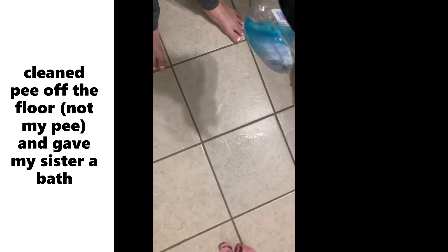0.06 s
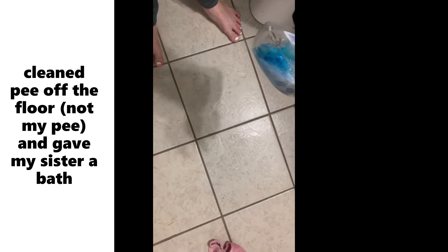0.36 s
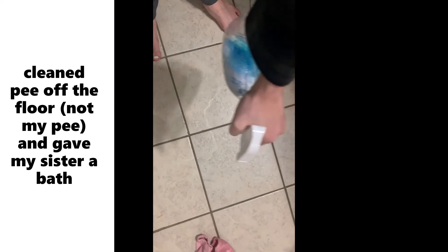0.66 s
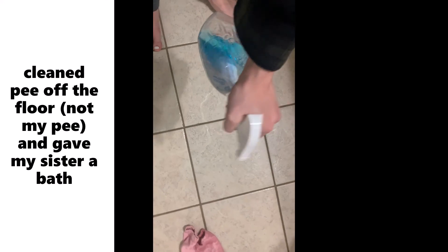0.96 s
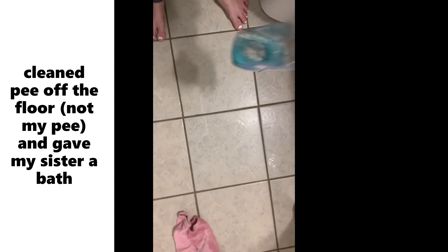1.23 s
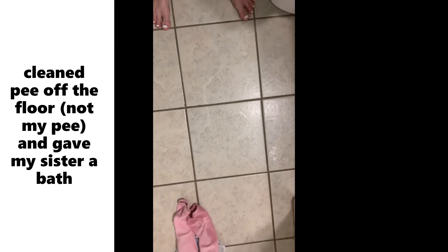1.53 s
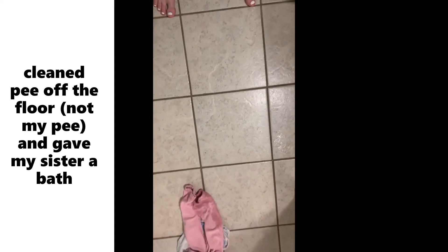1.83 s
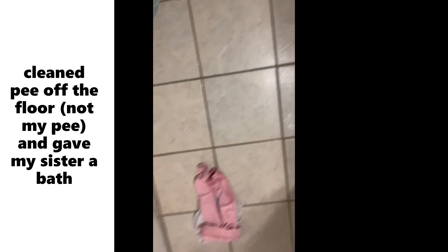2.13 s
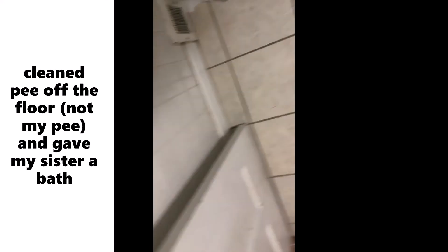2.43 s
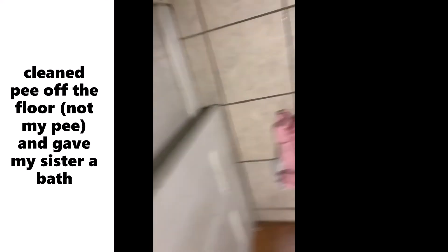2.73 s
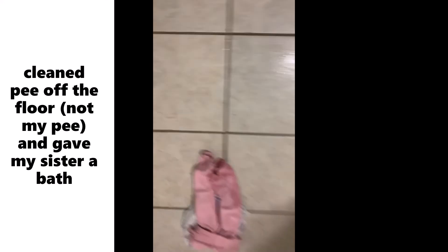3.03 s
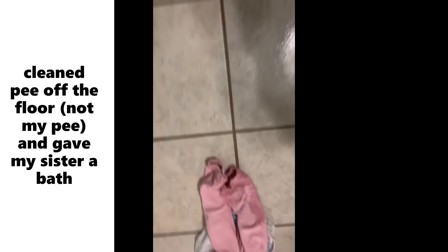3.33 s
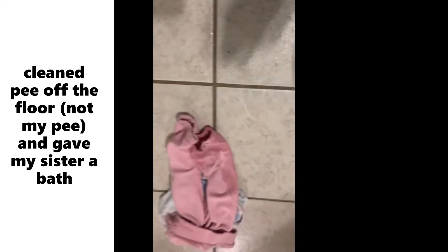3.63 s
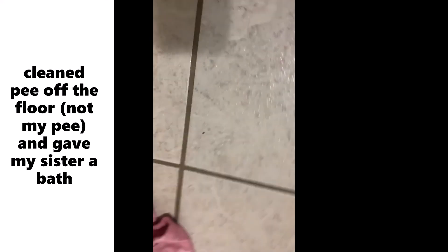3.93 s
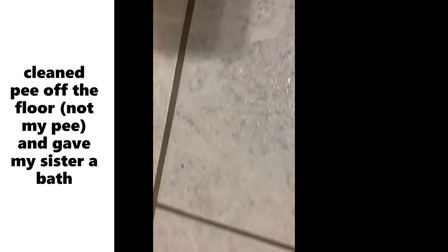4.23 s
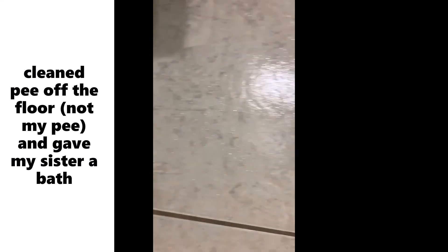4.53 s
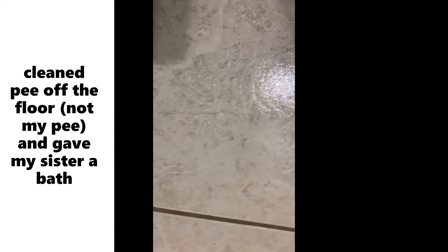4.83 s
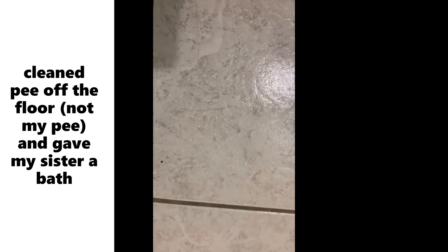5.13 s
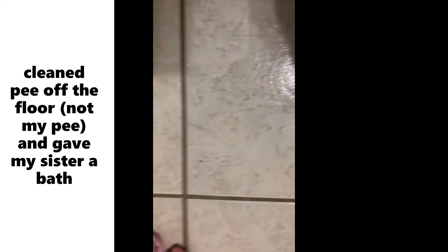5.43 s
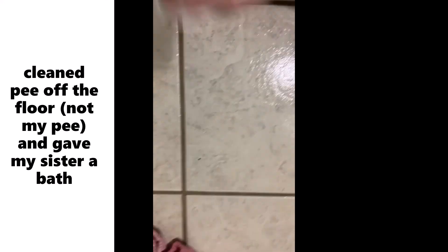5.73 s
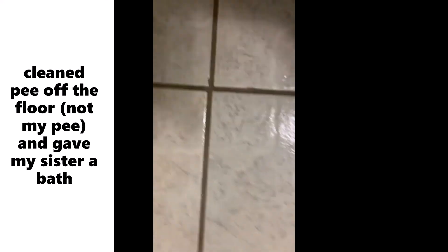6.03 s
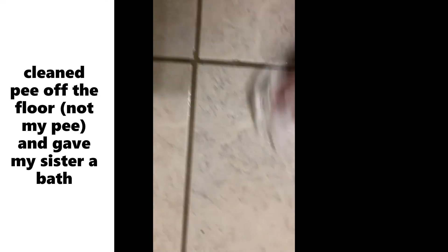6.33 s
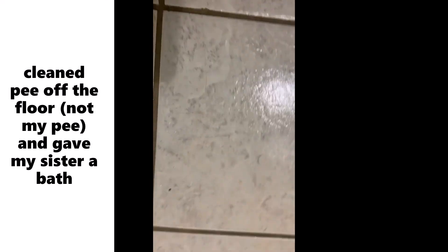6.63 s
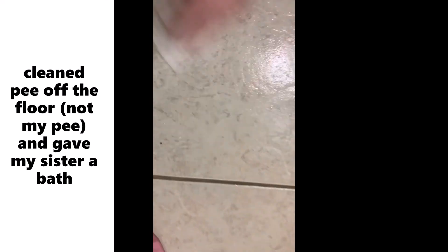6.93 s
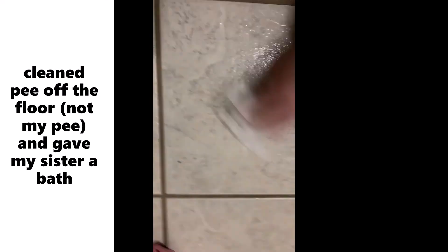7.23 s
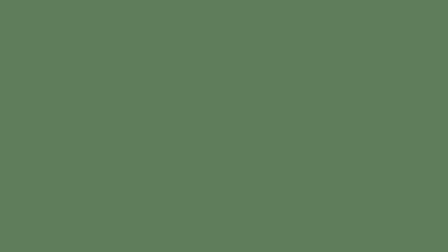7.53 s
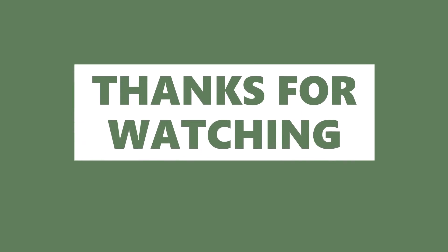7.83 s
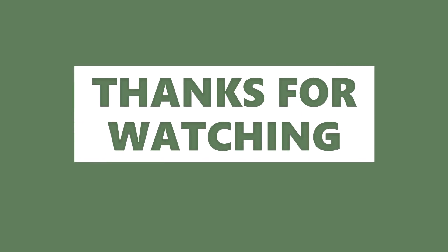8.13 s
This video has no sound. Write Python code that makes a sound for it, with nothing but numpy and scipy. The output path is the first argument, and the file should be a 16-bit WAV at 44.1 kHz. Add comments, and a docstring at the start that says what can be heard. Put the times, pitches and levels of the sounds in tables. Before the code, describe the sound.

A bath tap runs steadily into a tub, splashing and gurgling over a faint pipe hum, with one close double knock.

```python
"""Bath tap filling a tub

In a small tiled room the jet sprays, spits, churns up bubbles and rumbles in the tub.
The flow keeps the pipe singing on two notes; levels drift as the listener moves about.
Soft low thumps come and go, one double knock sounds close by, and all stops abruptly near the end."""
import sys
import numpy as np
from scipy import signal
from scipy.fft import rfft, irfft, next_fast_len
from scipy.io import wavfile
from scipy.ndimage import uniform_filter1d

SR = 44100
rng = np.random.default_rng(int(sys.argv[2]) if len(sys.argv) > 2 else 0)


def wrap_up_sound(samples):
    """Save the sound to the file named by the first command line argument, as 16-bit audio."""
    columns = np.atleast_2d(samples).T
    # keep every value between -1 and 1, then stretch to whole-number steps
    tamed = np.clip(columns, -1, 1)
    steps = np.round(tamed * 32767).astype(np.int16)
    wavfile.write(sys.argv[1], SR, steps)


N = 369116
TIME_S = np.arange(N) / SR

# Spectra of spray, splash, rumble and tub hollow. Each row: frequency in Hz, relative level in dB.
SPRAY_SPECTRUM = [(900, -32), (2000, -6.5), (3300, 2.5), (7000, -1), (12600, -5), (13600, -13.5),
                  (15700, -12.5)]
SPLASH_SPECTRUM = [(150, -13), (320, -2), (370, 9.5), (460, 8.5), (560, 0), (650, 1.5), (900, -1),
                   (1450, 0), (2200, -2.5), (3300, -7.5), (6000, -12.5)]
RUMBLE_SPECTRUM = [(20, -24), (45, -10.5), (60, -2), (75, 3), (92, -5), (112, -2.5), (131, 4), (152, -6),
                   (172, -1.5), (195, -4), (300, -32)]
HOLLOW_SPECTRUM = [(100, -33.5), (145, -14.5), (165, -1.5), (180, -9.5), (204, 5.5), (226, -5), (246, 1.5),
                   (264, -9), (290, -4), (325, -14.5), (362, -4.5), (385, -5.5), (405, -15), (600, -44)]
# Left-right likeness. Each row: frequency in Hz, shared fraction of the power.
LIKENESS = [(25, .82), (60, .9), (200, .94), (440, .87), (600, .52), (1000, .46), (2600, .42), (3400, .68),
            (8000, .67), (12000, .62), (15000, .56)]
# Centres of treble bands where left and right are nearly alike.
ALIKE_HZ = [4960, 7050, 9000, 10950, 12880, 14850]
# Each row: frequency in Hz, lead of left over right in radians.
LEFT_LEAD = [(0, 0), (650, .4), (1200, -.2), (2000, -1.8), (2450, -1.7), (2900, -.8), (3600, -.9),
             (4500, -2.35), (16000, -20.7)]
# Tub and room resonances. Each row: centre in Hz, width in Hz, lift in dB.
TUB_MODES = [(460, 38, 0), (558, 16, 7), (637, 22, 4.5), (1103, 24, 1.5), (1415, 60, 1), (1810, 26, 2),
             (2450, 50, 2), (3300, 160, 1), (6910, 140, 3)]
# Drift as the listener moves. Each row: time in seconds, spray gain in dB, splash gain in dB.
JET_LEVELS = [(0.0, -36, -34.5), (0.15, -35.5, -35), (0.32, -39.5, -36), (0.7, -38, -37.5),
              (1.3, -37.5, -35), (1.7, -36.5, -39.5), (2.15, -33.5, -36.5), (2.5, -35, -39.5),
              (3.0, -37.5, -37.0), (3.3, -36, -37), (4.15, -36.5, -35.5), (4.95, -37.5, -35.5),
              (5.55, -39.0, -37), (6.1, -37.5, -35), (6.6, -34.5, -35.3), (6.85, -36.5, -34.5),
              (7.25, -35.5, -35), (7.5, -38.5, -39.5)]
# Heavy slugs of water. Each row: start in seconds, spray lift in dB, splash lift in dB.
SLUGS = [(.085, 1.5, -1.5), (.22, -2, 1.5), (0.368, 3, 2.5), (0.529, -1, 2.5), (.6, -2, -2),
         (0.713, 5, 3.5), (.775, -1, 1), (.84, 1, 4.5), (0.903, 2, 3.5), (.995, 1, -1.5), (1.09, 1.5, 1),
         (1.343, 2, 3), (1.523, 2.5, 3.5), (1.803, -3, 4.5), (2.128, 1, 2.5), (2.205, -1, 4), (3.035, 0, 0),
         (3.125, 0, 2.5), (3.775, -3, 2.5), (4.053, 4.5, 1), (4.105, 4.5, 2.5), (4.163, 4.5, -1),
         (4.275, 0, 0.5), (4.42, 0.5, -1.5), (4.698, 1.5, 4), (4.84, 0.5, -0.5), (5.27, 5.5, 4),
         (5.32, -2, 1.5), (5.403, 4, 1.5), (5.692, 6, 6), (5.92, 2.5, 2.5), (6.058, 4, 3), (6.468, 3, 1),
         (6.555, 0.5, 3), (6.675, -1.5, 1), (6.988, 1, 2.5), (7.218, -0.5, 2.5), (7.335, -1, 4)]
# Moving through standing waves. Each row: time in seconds, then rumble, hollow and pipe breath in dB.
LOW_LEVELS = [(0, -44.5, -41, -41), (.3, -43.5, -35.5, -41), (.8, -46, -39, -40), (1.05, -43, -35, -50),
              (1.4, -46.5, -37.5, -48.5), (2.1, -41, -39, -44), (2.55, -44, -40, -46.5),
              (3.0, -46, -39.5, -41), (3.33, -43, -43.5, -38), (3.68, -38.5, -45.5, -49.5),
              (4.1, -36.5, -42.5, -65), (5.2, -38.5, -41, -60.5), (5.8, -38.5, -43, -49),
              (6.4, -37.5, -39, -62), (7.0, -39.5, -45, -57), (7.5, -38, -42.5, -55.5)]
# Pitch and rms tremble of the pipe's notes: low, high.
PIPE_HZ = [422.2, 759.8]
PIPE_TREMBLE_DB = [0.46, 2.5]
# Each row: time in seconds, low note in dB, high note in dB.
PIPE_LEVELS = [(0, -51, -50.5), (1.4, -39, -53), (2.6, -47, -54.5), (2.86, -45, -65), (3.02, -39, -58),
               (3.3, -34.5, -48), (3.5, -33, -58), (3.8, -40.5, -56), (3.95, -39, -45.5), (4.3, -38, -46.5),
               (5.2, -38.5, -47.5), (5.55, -36.5, -55), (5.88, -35.5, -56), (6.1, -41.5, -47.5),
               (6.801, -37, -45.5), (6.95, -39.5, -54), (7.25, -39.5, -63), (7.4, -42, -46)]
# The pipe's breathy ring. Each row: time in seconds, centre in Hz.
BREATH_PITCH = [(0, 465.5), (.9, 472), (2.1, 464), (2.65, 490), (3.0, 469), (3.4, 455), (3.7, 458)]
# Each row: start in seconds, level in dB, pitch in Hz, t60 in seconds.
THUMPS = [(0.179, -27.5, 208, 0.17), (0.267, -31, 199, 0.17), (0.357, -31, 195, 0.28),
          (0.409, -27, 241, 0.15), (0.533, -30, 191, 0.18), (0.709, -21.5, 210, 0.15),
          (0.899, -33, 210, 0.15), (1.086, -30.5, 196, 0.2), (1.245, -30, 200, 0.22),
          (1.335, -28.5, 185, 0.18), (2.071, -34, 304, .3), (2.186, -35, 209, .18), (2.788, -21, 222, 0.12),
          (2.8, -34, 367, 0.27), (2.982, -30, 203, 0.33), (3.325, -28.5, 240, 0.1), (3.981, -26, 153, 0.15),
          (4.265, -35, 205, .16), (4.301, -29.5, 128.5, 0.49), (4.441, -32, 202.4, 0.17),
          (4.704, -31, 214, 0.17), (5.084, -33, 192, .16), (5.185, -31, 198, 0.38),
          (5.381, -32.5, 139.4, 0.34), (5.69, -27, 159, 0.18), (6.137, -27.5, 146, 0.2),
          (6.166, -24.5, 199.6, 0.28), (6.433, -22.5, 212.5, 0.18), (7.149, -32, 136, 0.17),
          (7.442, -30.5, 182, 0.25)]
# Each row: start in seconds, level in dB, t60 in seconds, brightest frequency in Hz.
SPITS = [(.2, -34.5, 0.21, 8040), (.31, -44, .08, 3460), (.362, -37, .15, 1450), (.524, -31, .08, 9900),
         (.535, -29.5, .2, 2500), (.575, -35.5, 0.99, 3580), (0.899, -40, .16, 1450),
         (1.106, -34, .2, 2050), (1.223, -41, .1, 3580), (1.815, -37, .3, 3500), (2.873, -32, 0.089, 3110),
         (3.231, -35, 0.22, 6000), (3.48, -33, 0.15, 7000), (3.667, -33, 0.23, 3500),
         (4.32, -33, 0.11, 6950), (4.51, -32, 0.14, 7000), (4.705, -29, .1, 3400),
         (4.98, -33.5, 0.13, 7400), (5.305, -29, 0.39, 3630), (5.697, -33.5, .1, 3540),
         (6.05, -35, .2, 1350), (6.37, -37.5, .12, 7000), (6.727, -30.5, 0.12, 7000),
         (6.983, -30.5, .2, 3500)]
# Each row: start in seconds, dry level of each fragment in dB, pitch in Hz.
GURGLES = [(0.453, -29, 1668), (.668, -43, 1160), (.995, -34, 1800), (1.085, -33, 1820), (1.352, -38, 1350),
           (1.52, -39, 1600), (5.565, -38, 1500), (6.138, -34, 1350), (6.154, -29.5, 1377)]
# Each row: start in seconds, blow level in dB, pitch in Hz, rise in seconds,
# then panel, click and thud gains in dB, thud pitch in Hz.
KNOCK_BLOWS = [(1.792, -16, 368, .0054, -15, -7.5, -25, 110),
               (1.8028, -14.5, 345, .0036, -25, -50, -28, 90), (1.8135, -20, 335, .005, -30, -50, -32, 70),
               (1.862, -14.5, 266, .008, -14.5, -50, -26.5, 85)]
# Low and high modes of the knocked panel. Each row: frequency in Hz, relative level in dB, t60 in seconds.
PANEL_MODES = [(69.3, -9.5, 0.27), (128, -6, .24), (177, -11, 0.244), (215, -1, 0.55), (275, -12.5, .25),
               (347.5, 2.5, .17), (421, -4, 0.31), (443, -7.5, .2), (550, -19, .2), (711, -12.5, 0.13)]
CLICK_MODES = [(3775, -1, 0.014), (4040, -2, 0.01), (5300, -11.5, 0.0062), (6900, 5.5, 0.0037),
               (7740, -4, 0.0057), (10400, -10.5, .008)]


def gain_of(db):
    """Decibels to amplitude."""
    return 10 ** (np.asarray(db) / 20)


def unit_rms(x):
    """Scales to rms 1."""
    return x / np.sqrt(np.mean(x ** 2) + 1e-20)


def log_interp(table, hz):
    """Reads a table on a log-frequency axis."""
    table_hz, value = np.transpose(table)
    return np.interp(np.log(hz + 1), np.log(table_hz + 1), value)


def gain_curves(table):
    """One gain per sample for each dB column."""
    times_s, *columns = np.transpose(table)
    return [gain_of(np.interp(TIME_S, times_s, db)) for db in columns]


def add(mix, start_s, sound):
    """Mixes a sound in, in place."""
    part = mix[..., max(round(start_s * SR), 0):][..., :sound.shape[-1]]
    part += sound[..., :part.shape[-1]]


def tint(x, spectrum):
    """Filters by (Hz, dB) points and scales to rms 1."""
    size = next_fast_len(x.shape[-1])
    gain = gain_of(log_interp(spectrum, np.fft.rfftfreq(size, 1 / SR)))
    return unit_rms(irfft(rfft(x, size) * gain, size)[..., :x.shape[-1]])


def stereo(direct, diffuse, band_width_hz=760, band_likeness=.97):
    """Direct sound reaches the right first at most frequencies; diffuse sound differs on each side."""
    size = next_fast_len(N)
    hz = np.fft.rfftfreq(size, 1 / SR)
    bands = sum(np.exp(-(2 * (hz - centre_hz) / band_width_hz) ** 4) for centre_hz in ALIKE_HZ)
    share = np.clip((1 - bands) * log_interp(LIKENESS, hz) + bands * band_likeness, 0, 1)
    turn = np.exp(.5j * np.interp(hz, *np.transpose(LEFT_LEAD)))
    common = np.sqrt(share) * rfft(direct, size) * np.array([turn, 1 / turn])
    return irfft(common + np.sqrt(1 - share) * rfft(diffuse, size), size)[:, :N]


def room(x, t60_s, wet_db):
    """Dense reflections from the tiles, different on each side."""
    t = np.arange(SR // 2) / SR
    taps = rng.standard_normal((2, len(t))) * (rng.random((2, len(t))) < .1)
    taps *= (t > .003) * gain_of(-60 * t / t60_s)
    taps /= np.linalg.norm(taps, axis=1, keepdims=True)
    return gain_of(wet_db) * signal.fftconvolve(x[None], taps, axes=1)[:, :N]


def roving_room(x):
    """The reflections keep changing as the listener moves."""
    fades = (np.sqrt(2 / 3) * np.cos(np.pi * (TIME_S / 1.3 + k / 3)) for k in range(3))
    return sum(fade * room(x, t60_s=0.27, wet_db=3) for fade in fades)


def tub(x):
    """Lifts the narrow resonances of tub and room."""
    size = next_fast_len(N)
    hz = np.fft.rfftfreq(size, 1 / SR)
    lift_db = sum(db / (1 + (2 * (hz - mode_hz) / width_hz) ** 2) for mode_hz, width_hz, db in TUB_MODES)
    return irfft(rfft(x, size) * gain_of(lift_db), size)[:, :N]


def surges(per_s, fade_s, steady):
    """Water lands in random slugs: each raises the power at once, then fades."""
    landings = (rng.random(N) < per_s / SR) * np.minimum(rng.exponential(1, N), 3)
    power = signal.lfilter([1], [1, -np.exp(-1 / (fade_s * SR))], landings)
    return unit_rms(np.sqrt(power / power.mean() + steady))


def slug_gains(attack_s=0.005, hold_s=0.02, fade_s=0.019):
    """Each heavy slug briefly shifts the spray and splash levels."""
    lift_db, t = np.zeros((2, N)), np.arange(SR // 4) / SR
    shape = np.minimum(t / attack_s, 1) * np.exp(-np.maximum(t - attack_s - hold_s, 0) / fade_s)
    for start_s, spray_db, splash_db in SLUGS:
        add(lift_db, start_s, np.outer([spray_db, splash_db], shape))
    return gain_of(lift_db)


def drops(per_s, spread_db):
    """Random impacts of uneven size."""
    hits = rng.random(N) < per_s / SR
    return hits * gain_of(spread_db * np.minimum(rng.exponential(1, N), 4)) * rng.choice([-1, 1], N)


def ping(hz, decay_cycles, rise):
    """A dying sine that rises in pitch, as a bubble does near the surface."""
    age = np.arange(int(4 * decay_cycles * SR / hz)) * hz / (decay_cycles * SR)
    return np.exp(-age) * np.sin(2 * np.pi * decay_cycles * (age + rise * age ** 2 / 2))


def pings(count, low_hz, high_hz, decay_cycles, spread_db):
    """Many short pings, random in time, pitch and strength."""
    out = np.zeros(N)
    for when, pitch, strength in rng.random((count, 3)):
        hz = low_hz * (high_hz / low_hz) ** pitch
        gain = hz * gain_of(-spread_db * np.log(strength + 0.025))
        add(out, when * N / SR, gain * ping(hz, decay_cycles, rise=.025))
    return unit_rms(out)


def churn(x, depth_db):
    """Bubble clouds brighten passing patches of the spectrum."""
    frames = signal.stft(x, nperseg=512, noverlap=384)[2]
    patches = rng.standard_normal(frames.shape[1:])
    for _ in range(2):
        patches = uniform_filter1d(uniform_filter1d(patches, size=5, axis=0), size=9, axis=1)
    frames *= gain_of(depth_db * np.minimum(unit_rms(patches), 1.6))
    return unit_rms(signal.istft(frames, nperseg=512, noverlap=384)[1][:, :N])


def spray(gain):
    """Droplets patter in a bright hiss, with a faint fizz of short high pings."""
    patter = unit_rms(drops(per_s=6000, spread_db=-0.5))
    fizz = gain_of(-10.5) * pings(count=5000, low_hz=2552, high_hz=14000, decay_cycles=60, spread_db=-1.5)
    hiss = tub(stereo(unit_rms(patter + fizz), rng.standard_normal((2, N))))
    return churn(tint(hiss, SPRAY_SPECTRUM), depth_db=1.94) * gain * gain_of(-1.67)


def spatter(gain, t60_s=0.13):
    """Stray drops slap the tub wall, each dying in a short fizz."""
    t = np.arange(SR // 8) / SR
    power = signal.fftconvolve(drops(per_s=22, spread_db=1.0) ** 2, gain_of(-60 * t / t60_s) ** 2)[:N]
    slaps = rng.standard_normal((3, N)) * np.sqrt(abs(power))
    spectrum = [(1500, -21), (3500, -1), (7000, -3.5), (12000, -1.5), (15700, -5.5)]
    return tint(stereo(slaps[0], slaps[1:]), spectrum) * gain * gain_of(-9.5)


def splash(gain):
    """Bubbles froth over the wash where the jet enters."""
    bubbles = gain_of(-6) * pings(count=6000, low_hz=500.4, high_hz=3617, decay_cycles=10.5, spread_db=2.5)
    wash = rng.standard_normal((3, N))
    water = tub(stereo(bubbles + wash[0], roving_room(bubbles) + wash[1:]))
    return churn(tint(water, SPLASH_SPECTRUM), depth_db=1.36) * gain * gain_of([[0.3], [-0.3]])


def plunge(rumble_gain, hollow_gain):
    """The falling column shakes the tub in uneven heaves; its low resonances boom."""
    deep, hollow = rng.standard_normal((2, 3, N))
    heave = surges(per_s=24, fade_s=0.036, steady=1.45)
    rumble = tint(stereo(deep[0], deep[1:]), RUMBLE_SPECTRUM) * rumble_gain
    boom = tint(stereo(hollow[0], hollow[1:]), HOLLOW_SPECTRUM) * hollow_gain
    return heave * (rumble + boom)


def resonate(x, centre_hz, width_hz):
    """Unity-gain resonance with a moving centre."""
    turn = np.exp(2j * np.pi * np.cumsum(centre_hz) / SR)
    pole = np.exp(-np.pi * width_hz / SR)
    return 2 * (turn * signal.lfilter([1 - pole], [1, -pole], x / turn)).real


def pipe(breath_gain):
    """The flow sings on two trembling notes, with a breathy ring drifting just above the lower."""
    notes = np.zeros((2, N))
    slow_spectrum = [(1, -5.5), (8, -2.5), (30, -24.0), (200, -89.5)]
    for hz, tremble_db, gain in zip(PIPE_HZ, PIPE_TREMBLE_DB, gain_curves(PIPE_LEVELS)):
        waver, tremble, drift = (tint(rng.standard_normal(N), slow_spectrum) for _ in range(3))
        phase = 2 * np.pi * hz * TIME_S + 0.08 * waver
        tone = np.sqrt(2) * np.sin([phase, phase + 0.35 * drift])
        notes += gain * unit_rms(gain_of(tremble_db * tremble)) * tone
    noise = rng.standard_normal((3, N))
    breath = stereo(noise[0], noise[1:])
    centre_hz = np.interp(TIME_S, *np.transpose(BREATH_PITCH))
    for _ in range(2):
        breath = resonate(breath, centre_hz, width_hz=34)
    return notes + unit_rms(breath) * breath_gain


def thumps(attack_s=0.0043):
    """Dull hollow blows: a low note with a soft start and a puff of noise."""
    out, t = np.zeros(N), np.arange(SR // 2) / SR
    puff_spectrum = [(40, -18.0), (130, -8.0), (230, -5.5), (500, -11.5), (1200, -50.0)]
    for start_s, db, hz, t60_s in THUMPS:
        puff = tint(rng.standard_normal(len(t)), puff_spectrum)
        swell = (1 - np.exp(-t / attack_s)) * gain_of(-60 * t / t60_s)
        add(out, start_s, gain_of(db) * swell / swell.max() * (np.sin(2 * np.pi * hz * t) + 0.33 * puff))
    return out


def spits(attack_s=0.00091):
    """The jet spits: bright bursts that die in the room."""
    out, t = np.zeros((3, N)), np.arange(SR // 4) / SR
    for start_s, db, t60_s, hz in SPITS:
        spectrum = [(hz / 8, -14), (hz * 0.76, -6), (hz, 0), (hz * 1.4, -7), (hz * 4, -14)]
        burst = tint(rng.standard_normal((3, len(t))), spectrum)
        add(out, start_s, burst * gain_of(db - 60 * t / t60_s) * (1 - np.exp(-t / attack_s)))
    return stereo(out[0], out[1:])


def gurgles(cluster_s=.014, pitch_spread=0.0685):
    """A big bubble breaks into a thinning cluster of five: a chirp that echoes round the tub."""
    out = np.zeros(N)
    delays_s = cluster_s * np.linspace(0, 1, 5) ** 2
    for start_s, db, hz in GURGLES:
        pitches_hz = hz * (1 + pitch_spread * (rng.random(5) - .5))
        for delay_s, pitch_hz in zip(delays_s, pitches_hz):
            add(out, start_s + delay_s, gain_of(db) * ping(pitch_hz, decay_cycles=6.9, rise=0.012))
    return out + room(out, t60_s=0.17, wet_db=0)


def ring(modes, t, attack_s):
    """Struck modes: dying sines, scaled to peak 1, then faded in."""
    sound = sum(gain_of(db - 60 * t / t60_s) * np.sin(2 * np.pi * hz * t) for hz, db, t60_s in modes)
    return sound / abs(sound).max() * (1 - np.exp(-t / attack_s))


def bump(t, rise_s):
    """Smooth pulse peaking at 1 after rise_s."""
    return (t / rise_s) ** 2 * np.exp(2 - 2 * t / rise_s)


def knock(sag_hz_per_s=1200):
    """A knocked panel clicks, stutters, thuds, rings and rattles; a duller rebound follows."""
    body, click, t = np.zeros(N), np.zeros(N), np.arange(SR // 2) / SR
    rattle_spectrum = [(200, -10.0), (500, 6.0), (1000, -9), (3300, -9.5), (9000, -28.0)]
    for start_s, db, hz, rise_s, panel_db, click_db, thud_db, thud_hz in KNOCK_BLOWS:
        blow = bump(t, rise_s) * np.sin(2 * np.pi * (hz - sag_hz_per_s * t / 2) * t)
        rattle = tint(rng.standard_normal(len(t)), rattle_spectrum) * gain_of(-22.0 - 60 * t / 0.2)
        thud = bump(t, rise_s=0.011) * np.sin(2 * np.pi * thud_hz * t)
        add(body, start_s, gain_of(db) * (blow + rattle))
        add(body, start_s + .005, gain_of(thud_db) * thud)
        add(body, start_s + .012, gain_of(panel_db + 3.0) * ring(PANEL_MODES, t, attack_s=0.0061))
        add(click, start_s - .0004, gain_of(click_db) * ring(CLICK_MODES, t, attack_s=.0001))
    return body + click + room(body, t60_s=0.26, wet_db=-19.5) + room(click, t60_s=0.17, wet_db=-4.5)


def scene():
    """The whole bathroom; one uneven flow drives spray, spatter and splash."""
    flow = surges(per_s=35, fade_s=0.028, steady=5.5)
    spray_gain, splash_gain = flow * slug_gains() * gain_curves(JET_LEVELS)
    rumble_gain, hollow_gain, breath_gain = gain_curves(LOW_LEVELS)
    water = spray(spray_gain) + spatter(spray_gain) + spits() + splash(splash_gain) + gurgles()
    return water + plunge(rumble_gain, hollow_gain) + pipe(breath_gain) + thumps() + knock()


def record(dry):
    """Abrupt stop, then a steep low-pass."""
    stop_s, fade_s, cutoff_hz = 7.535, 0.046, 15850
    gate = np.clip((stop_s - TIME_S) / fade_s + .5, 0, 1)
    lowpass = signal.firwin(511, cutoff_hz, window=("kaiser", 9), fs=SR)
    return signal.oaconvolve(dry * gate, lowpass[None], "same")


dry = scene()
out = record(dry)
wrap_up_sound(out)
```